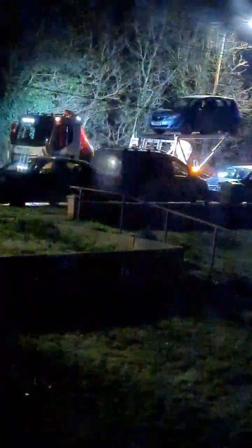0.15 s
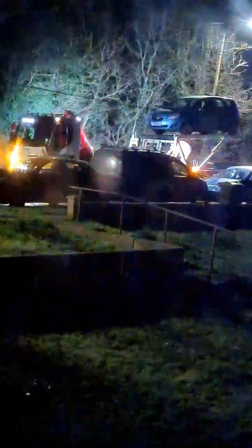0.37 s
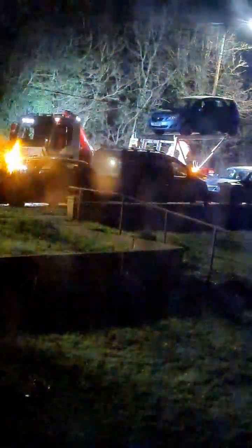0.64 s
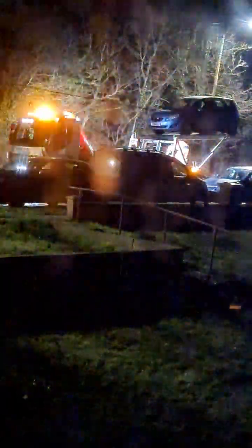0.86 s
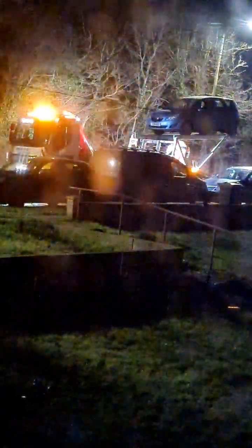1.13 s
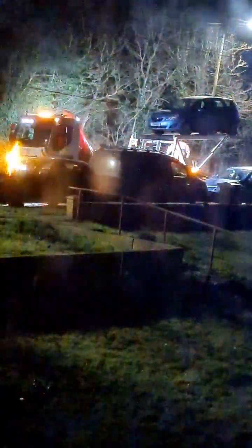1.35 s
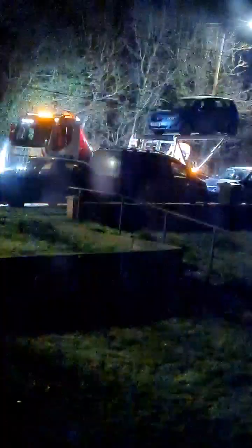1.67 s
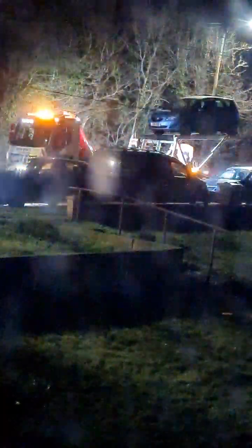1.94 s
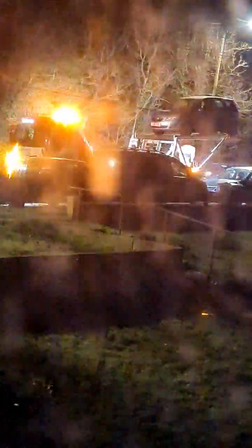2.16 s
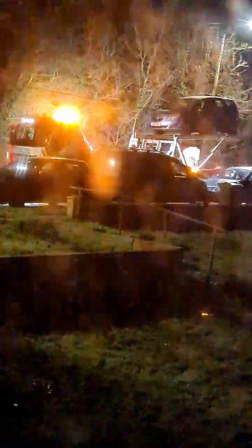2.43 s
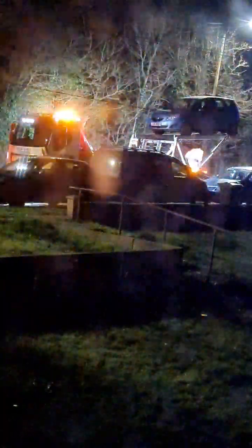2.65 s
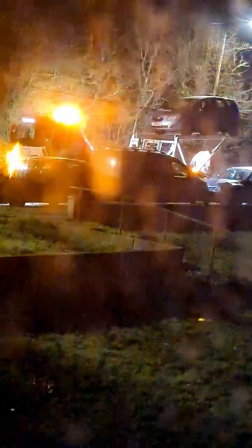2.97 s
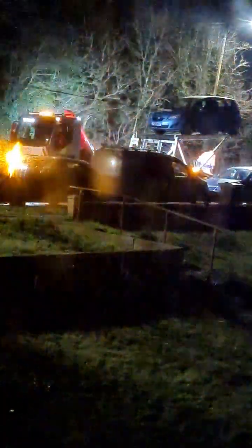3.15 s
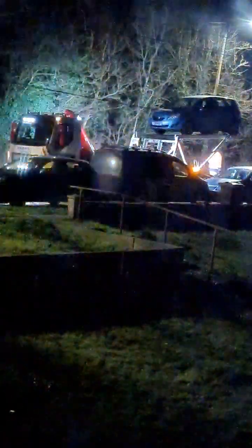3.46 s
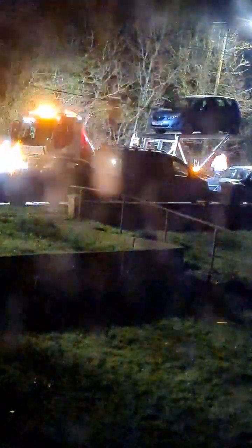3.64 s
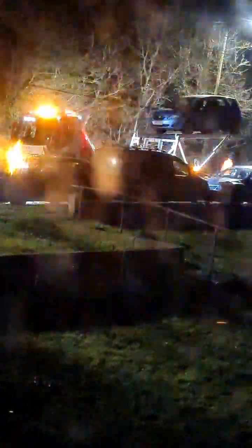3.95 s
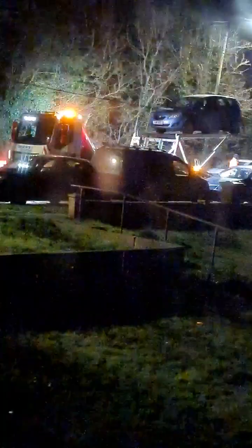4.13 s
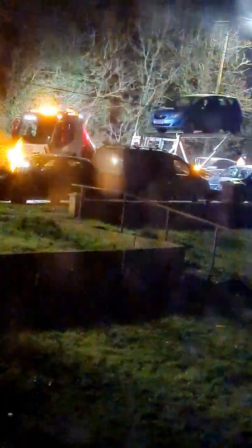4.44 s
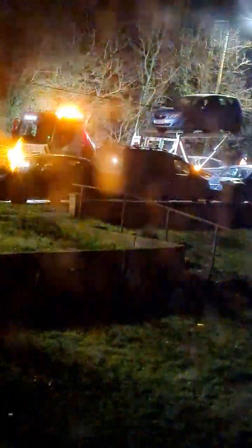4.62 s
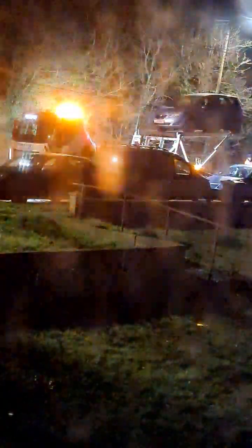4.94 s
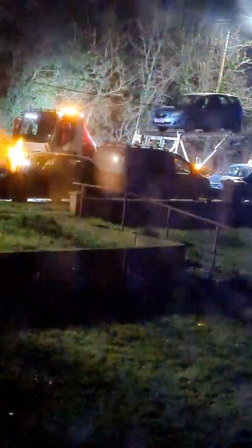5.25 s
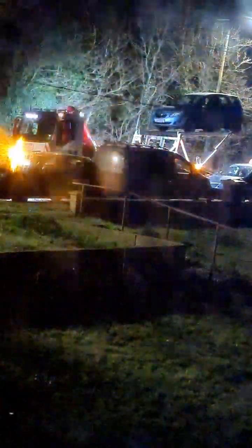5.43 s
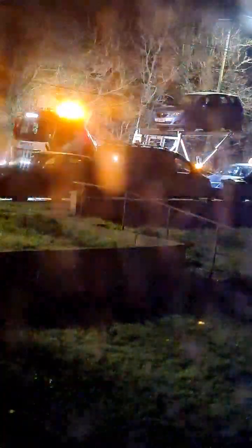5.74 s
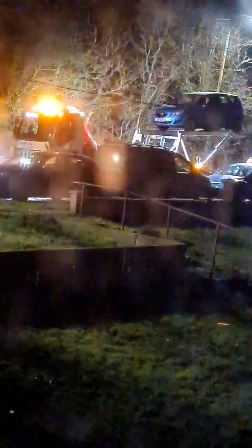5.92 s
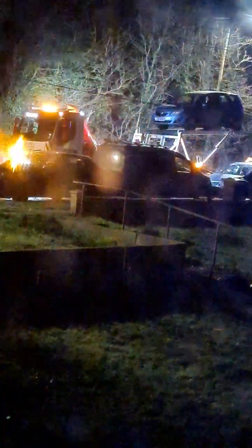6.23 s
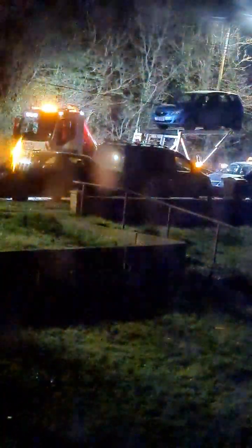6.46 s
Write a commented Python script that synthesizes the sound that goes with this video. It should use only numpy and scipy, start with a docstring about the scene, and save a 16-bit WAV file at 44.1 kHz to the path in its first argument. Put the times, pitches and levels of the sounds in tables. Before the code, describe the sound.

Muffled truck engine idling outside as a car's hum grows, then a distant door thud, a short scrape and a few hollow knocks.

```python
"""A six-cylinder truck idles across a street at night, heard from indoors through a window.
Its periodic firing gives a low tone and modulates exhaust, block and street noise. A steady hum
and the engine of a nearing car beat against that tone, and a drone throbs above it. Late on, a distant
door thuds, then something scrapes, with a few hollow knocks, while the noise swells. Faint squeaks come
and go. Resonances of window and room colour every source, and the microphone adds its hiss."""
import sys
import numpy as np
from scipy import signal
from scipy.fft import rfft, irfft, next_fast_len
from scipy.io import wavfile
from scipy.ndimage import uniform_filter1d, map_coordinates

SR = 44100
rng = np.random.default_rng(int(sys.argv[2]) if len(sys.argv) > 2 else 0)


def unload_audio(sound):
    """Save the sound as a 16-bit wav file, at the path given as the first command line argument."""
    columns = np.transpose(np.atleast_2d(sound))
    # keep every value between -1 and 1, then stretch to whole-number steps
    steps = np.round(np.clip(columns, -1, 1) * 32767)
    wavfile.write(sys.argv[1], SR, steps.astype(np.int16))


N = 290619
TIME = np.arange(N) / SR


def truck_tones(firings):
    """Harmonic series: six unequal firings a cycle give the firing tone and weaker cycle orders."""
    firing_level = [(0.0, -56), (0.6, -52), (2.5, -52), (3.6, -53.5), (4.5, -50.5), (6.59, -52)]  # firing tone: (time [s], level [dB])
    orders = np.array([12, 16, 17, 18, 24, 25, 26, 27, 29, 30, 33, 35])  # partials: (frequency [multiples of the four-stroke cycle rate])
    order_levels = [-64.5, -68, -64, -64.5, -55.5, -57, -61, -63, -65, -62, -66.5, -65]  # the same partials: (level [dB])
    fundamental = tone(firings, curves(firing_level)[0], waver_db=1.1, drift=0.08)
    return fundamental + sum(tone(k * firings / 6, db, waver_db=1.0, drift=0.25)
                             for k, db in zip(orders, order_levels))


def truck_and_street_noise(firings):
    """Amplitude modulation: exhaust rumble, combustion knock and the street's rush pulse at each firing."""
    # the street's rush, with a late swell during the thud and scrape: (time [s], level [dB])
    rush_level = [(0.0, -59.5), (0.35, -62.5), (0.8, -64.5), (1.6, -66), (2.1, -64), (2.56, -59),
                  (2.75, -62), (3.4, -64.5), (4.2, -61), (5.0, -61.5), (5.58, -60.5), (5.72, -56),
                  (5.85, -57), (6.0, -56), (6.12, -57.5), (6.4, -59.5), (6.59, -59)]
    treble_gain = [(0.0, 3.5), (0.4, 2), (1.5, 0.5), (2.6, 0.5), (4.2, 1), (5.1, -1), (5.75, -2),
                   (6.59, 1.5)]  # extra treble of the rush: (time [s], gain [dB])
    rush_spectrum = [(530, -27.5), (900, -7), (1010, -0.5), (1170, -0.5), (1420, -3), (1670, -8.5),
                     (2050, -13), (2340, -26.5), (4000, -39), (5200, -65.5), (8800, -120)]  # the street's rush: (frequency [Hz], relative density [dB])
    exhaust_spectrum = [(18, -31.5), (30, -19.5), (42, -11), (60, -5), (90, -1), (115, -5.5), (140, -2),
                        (175, -3.5), (210, 2.5), (270, -3.5), (310, -6), (340, -14), (420, -19.5),
                        (560, -17.5), (800, -49.5)]  # exhaust: (frequency [Hz], relative density [dB])
    block_modes = [(659, 56.4, 1), (730.6, 69, -0.5), (825, 83, -3.5)]  # block and window modes: (frequency [Hz], bandwidth [Hz], gain [dB])
    rush_db = curves(rush_level)[0]
    swing_db = rush_db + 63  # about the rush's mean level; the two lower layers follow it in part
    exhaust_db = -49 + 0.57 * swing_db + 0.68 * wobble(6)
    block_db = -58 + 0.73 * swing_db + 0.68 * wobble(9)
    pulse = np.cos(2 * np.pi * firings)
    lope = 1 + 0.22 * np.cos(2 * np.pi * firings / 6)  # the strongest cylinder, once a cycle
    exhaust = noise(shape(exhaust_spectrum), patchy_db=1.5)
    exhaust = amp(exhaust_db) * unit((1 + 0.4 * pulse) * lope * exhaust)
    block = noise(resonances(block_modes), patchy_db=0.57)
    block = filtered(block, shape([(400, -29.0), (600, 0.5), (900, 2), (1300, -18.0)]))
    block = amp(block_db) * unit((1 + 0.076 * pulse) * block)
    rush = amp(rush_db) * unit((1 + 0.077 * pulse) * noise(shape(rush_spectrum), patchy_db=1.65))
    treble = filtered(rush, lambda hz: 1 / (1 + (1700 / (hz + 1)) ** 6))
    rush += (amp(curves(treble_gain)[0]) - 1) * treble
    return exhaust + block + rush


def firing_count():
    """Phase is the integral of frequency: the truck's firings gone by at each sample."""
    firing_rate = [(0.0, 49.66), (0.5, 49.65), (1.5, 49.09), (2.0, 49.0), (2.5, 48.39), (3.5, 48.79),
                   (4.5, 48.94), (6.59, 48.95)]  # idle speed: (time [s], firing rate [Hz])
    return np.cumsum(curves(firing_rate)[0]) / SR


def hum(hz=66.55):
    """Beating: a steady harmonic tone interferes with the firing tone just below it."""
    level = [(0.0, -52.5), (2.2, -59.5), (3.5, -55), (6.59, -55)]  # fundamental: (time [s], level [dB])
    overtones = [-64.5, -58.5, -60.5]  # harmonics 2, 3 and 4: (level [dB])
    fundamental = tone(hz * TIME, curves(level)[0], waver_db=1.5, drift=0.11)
    return fundamental + sum(tone(k * hz * TIME, db, waver_db=3.5, drift=0.31)
                             for k, db in enumerate(overtones, start=2))


def drone(firings, period_s=0.791, first_dip_s=0.57, depth=0.79):
    """Slow amplitude modulation: a tone just under the third firing harmonic throbs."""
    level = [(0.0, -49.5), (2.4, -47.5), (3.4, -51), (3.9, -58), (5.0, -51), (6.59, -51)]  # crests of the throb: (time [s], level [dB])
    throb = 1 - depth * np.cos(np.pi * (TIME - first_dip_s) / period_s) ** 2
    return throb * tone(2.978 * firings, curves(level)[0], waver_db=2.4, drift=0.48)


def car():
    """Beating: a nearing car's firing tone grows louder a few hertz above the truck's."""
    firing_rate = [(0.0, 52.6), (0.5, 52.7), (2.5, 57.5), (4.0, 58.2), (5.0, 57.8), (6.59, 57.8)]  # engine speed: (time [s], firing rate [Hz])
    level = [(0.0, -62), (2.0, -61), (3.4, -58), (4.2, -51.5), (5.2, -50), (6.59, -48.5)]  # firing tone: (time [s], level [dB])
    firings = np.cumsum(curves(firing_rate)[0]) / SR
    return tone(firings, curves(level)[0], waver_db=1.7, drift=0.13)


def door():
    """Modal damping: a blow and a weaker thump ring the door, and its highest modes die first."""
    modes = [(47.5, 12.6, -3), (65.4, 13.7, 0), (81.8, 23, -3.5), (111, 15, -6.5), (143.5, 20, 1),
             (200.5, 31.3, 1), (225, 44.4, -1), (285, 56, -3.5), (347.4, 25, 1), (407.4, 15, 1),
             (479, 28, -2), (518.6, 16, 1.5), (581.6, 44, -0.5)]  # door modes, per filter pass: (frequency [Hz], bandwidth [Hz], gain [dB])
    blows = [(5.724, -29), (6.175, -42.5)]  # shutting and thump: (time [s], level [dB])
    parts = [(-3.5, 228, .06, 1.4), (-1, 139, .03, 0.84), (-7, 300.5, 0.0092, 0.41)]  # boom, panel, knock: (gain [dB], rise [dB/s], hold [s], T60 [s])
    out = np.zeros(N)
    for (part_db, rise, hold, t60), group in zip(parts, (modes[:3], modes[3:8], modes[8:])):
        envelope = sum(amp(db + part_db + swell(start, hold, rise, 60 / t60)) for start, db in blows)
        ring = filtered(rng.standard_normal(N), lambda hz: resonances(group)(hz) ** 2)  # two passes
        out += envelope * unit(ring)
    return out


def scrape(fall_db_s=92.5, grit_rise_db_s=170):
    """Friction noise: dense grains under each stroke give a dull rustle, then a finer grit."""
    rustle_spectrum = [(450, -24), (700, -1.5), (1000, -12.5), (1450, -12.5), (2100, -16.5), (2400, -22),
                       (3100, -27.5), (3500, -31), (3900, -38)]  # dull rustle: (frequency [Hz], relative density [dB])
    grit_spectrum = [(3500, -21), (4100, -0.5), (4700, 0), (5300, -6), (6000, -8.5), (6800, -17.5)]  # fine grit: (frequency [Hz], relative density [dB])
    # scraping strokes: (time [s], hold [s], rustle treble level [dB], grit re that [dB], rise [dB/s])
    strokes = [(5.667, 0.1, -82, -7.5, 400), (5.9, 0.19, -76.5, -12.5, 200.5),
               (6.159, 0.13, -65, -10, 1500)]
    rustle_envelope, grit_envelope = np.zeros((2, N))
    for start, hold, db, grit_db, rise in strokes:
        stroke_db = swell(start, hold, rise, fall_db_s)
        build_db = swell(start + 0.41 * hold, hold, grit_rise_db_s, 0)  # the grit lags
        rustle_envelope += amp(db + stroke_db)
        grit_envelope += amp(db + grit_db + np.minimum(stroke_db, build_db))
    grains = lambda: rng.standard_normal(N) * amp(0.95 * wobble(150))
    rustle = filtered(grains(), shape(rustle_spectrum))
    rustle /= np.std(filtered(rustle, lambda hz: hz > 2300))  # its treble at rms 1
    grit = unit(filtered(grains(), shape(grit_spectrum)))
    return rustle_envelope * rustle + grit_envelope * grit


def knocks(attack_s=0.0027):
    """Free vibration: two damped partials sound each hollow knock in the thud and the scrape."""
    impacts = [(5.711, -31, 577, 0.1), (5.73, -33.5, 565, 0.043), (6.156, -37, 713, 0.054),
               (6.247, -29, 733, 0.046), (6.288, -42, 745, 0.058)]  # knocks: (time [s], level [dB], frequency [Hz], T60 [s])
    out = np.zeros(N)
    for start, db, hz, t60 in impacts:
        age = np.clip(TIME - start, 0, None)
        ring = 1.15 * np.sin(2 * np.pi * hz * age) + 0.52 * np.sin(2 * np.pi * 1.25 * hz * age)
        out += amp(db - 60 * age / t60) * (1 - np.exp(-age / attack_s)) * ring
    return out


def squeaks():
    """Narrow-band noise has a pitch: brief puffs of treble are heard as faint squeaks."""
    # squeaks: (time [s], duration [s], frequency [Hz], half-width [Hz], level [dB])
    puffs = [(1.15, 0.22, 4600, 330, -86), (2.25, 0.076, 2720, 130, -79.5), (5.17, .08, 2680, 130, -84)]
    out = np.zeros(N)
    for start, length, hz, width, db in puffs:
        envelope = np.sin(np.pi * np.clip((TIME - start) / length, 0, 1)) ** 0.33
        band = filtered(rng.standard_normal(N), lambda f: np.exp(-((f - hz) / width) ** 4))
        out += amp(db) * envelope * unit(band)
    return out


def indoors(x):
    """Resonance and antiresonance: window and room lift some narrow bands and swallow others."""
    bands = [(306, 12, 1), (323, 24, -2), (349, 14, 4.5), (377, 14, -5), (408, 15, 4.5), (411, 13, -5.5),
             (470, 12, 4.5), (495, 11, 2.5), (544, 26, -3), (567, 8.7, 3), (642, 8.9, 3.5),
             (678.4, 10, -7.5), (729, 28, 3), (751, 28, -3), (783, 20, 5), (800, 8.7, -3), (843, 8.4, -6.5),
             (909, 8.4, 5), (1027, 32, -3), (1120, 14, -6), (1124, 10, 6), (1220, 14, 3.5), (1433, 11, 5),
             (1520, 18, -2)]  # peaks and dips: (frequency [Hz], bandwidth [Hz], gain [dB])
    gain_db = lambda f: sum(db / (1 + (2 * (f - hz) / width) ** 2) for hz, width, db in bands)
    return filtered(x, lambda f: amp(gain_db(f)))


def microphone_hiss():
    """Self-noise: the microphone sets a steady floor of treble."""
    spectrum = [(1470, -29.5), (2500, -5), (2950, -5), (3980, -7.5), (4670, -6), (5020, -8), (6190, -10.5),
                (7590, -8.5), (9930, -14.5), (13400, -6.5), (14200, -14)]  # hiss: (frequency [Hz], relative density [dB])
    return amp(-83) * noise(shape(spectrum), patchy_db=1.5)


def tone(turns, db, waver_db, drift):
    """Random modulation: a sine of rms level db wavers in level and in phase (drift, in radians)."""
    phase = 2 * np.pi * (turns + rng.random()) + drift * wobble(5)
    return np.sqrt(2) * amp(db + waver_db * wobble(4.003)) * np.sin(phase)


def noise(response, patchy_db):
    """Filtered white noise of rms 1, its gain varying in random patches of time and frequency."""
    spectra = signal.stft(rng.standard_normal(N), nperseg=512)[2]
    patches = uniform_filter1d(rng.standard_normal(spectra.shape), size=6, axis=0)
    patches = uniform_filter1d(patches, size=10, axis=1)
    patchy = signal.istft(spectra * amp(patchy_db * unit(patches)), nperseg=512)[1][:N]
    return unit(filtered(patchy, response))


def resonances(modes):
    """Modal superposition: the response of damped resonators, summed with alternating sign."""
    return lambda f: sum((-1) ** k * amp(db) * 1j * f * width / (hz * hz - f * f + 1j * f * width)
                         for k, (hz, width, db) in enumerate(modes))


def shape(points):
    """Spectral envelope through (frequency [Hz], gain [dB]) points on a log axis."""
    f, db = np.transpose(points)
    return lambda hz: amp(np.interp(np.log(hz + 1), np.log(f), db, left=-120, right=-120))


def filtered(x, response):
    """Linear filtering: the spectrum of x times a frequency response."""
    size = next_fast_len(N + SR // 2)
    return irfft(rfft(x, size) * response(np.fft.rfftfreq(size, 1 / SR)), size)[:N]


def swell(start, hold, rise, fall):
    """Exponential growth until start, a hold, then decay: dB re the peak, slopes in dB/s."""
    return -rise * np.clip(start - TIME, 0, None) - fall * np.clip(TIME - start - hold, 0, None)


def wobble(rate):
    """Spline interpolation of random knots, rate of them a second."""
    return map_coordinates(rng.standard_normal(int(N * rate / SR) + 4), [TIME * rate])


def curves(rows):
    """Linear interpolation of each column after the time, one value per sample."""
    times, *columns = np.transpose(rows)
    return [np.interp(TIME, times, column) for column in columns]


def amp(db):
    """Decibels to amplitude ratio."""
    return 10 ** (np.asarray(db) / 20)


def unit(x):
    """Normalisation to rms 1."""
    return x / np.sqrt(np.mean(x ** 2) + 1e-20)


def scene():
    """Superposition: the sources outside add and reach one point indoors."""
    firings = firing_count()
    sustained = truck_tones(firings) + truck_and_street_noise(firings) + hum() + drone(firings) + car()
    return indoors(sustained + door() + scrape() + knocks() + squeaks())[None]


def record(dry, fade_s=0.005, top_hz=14250):
    """Band limiting: the sound fades in, hiss joins it, and nothing passes above top_hz."""
    fade_in = np.sin(np.pi / 2 * np.clip(TIME / fade_s, 0, 1)) ** 2
    return filtered(fade_in * dry[0] + microphone_hiss(), lambda hz: hz < top_hz)[None]


dry = scene()
out = record(dry)
unload_audio(out)
```